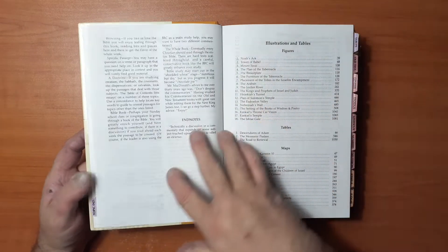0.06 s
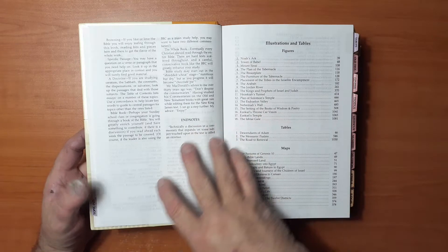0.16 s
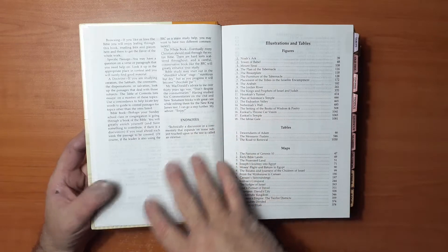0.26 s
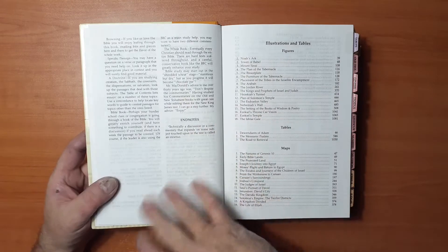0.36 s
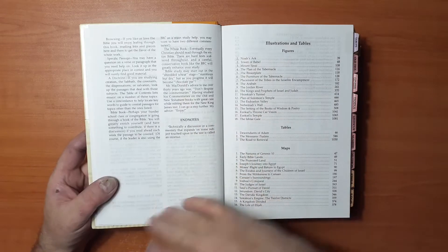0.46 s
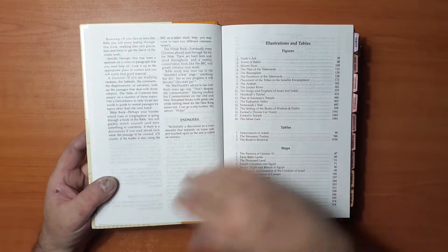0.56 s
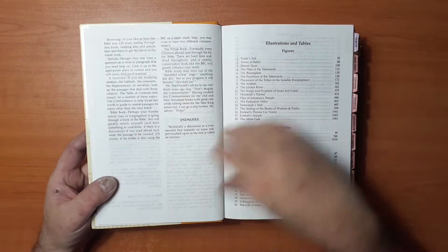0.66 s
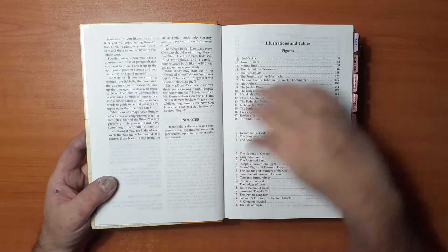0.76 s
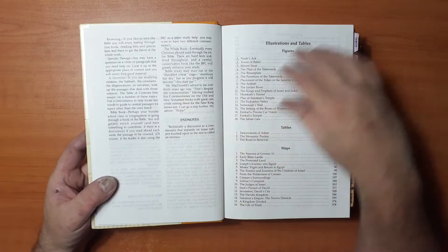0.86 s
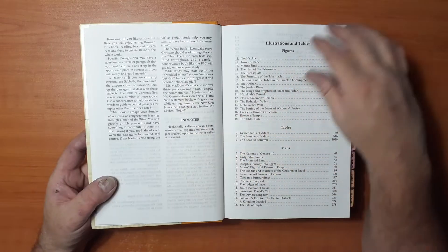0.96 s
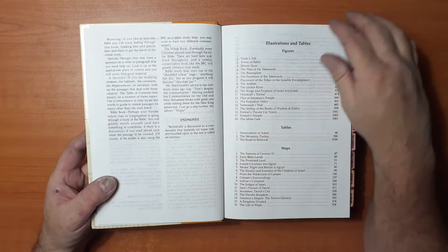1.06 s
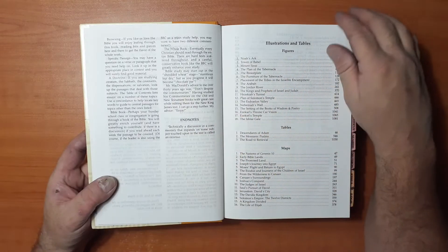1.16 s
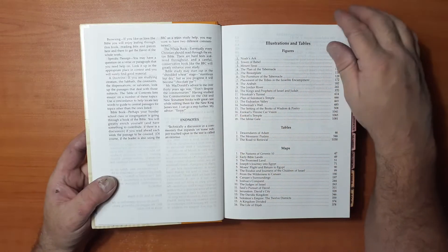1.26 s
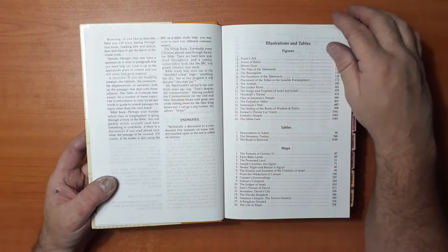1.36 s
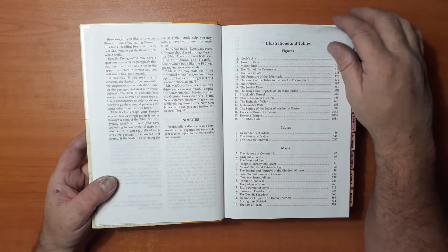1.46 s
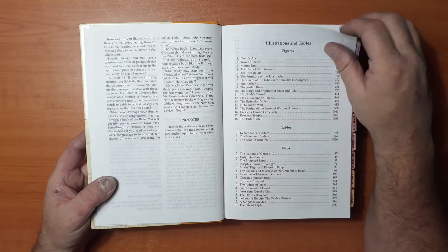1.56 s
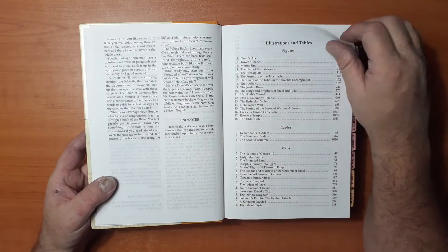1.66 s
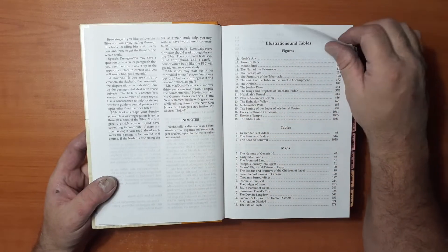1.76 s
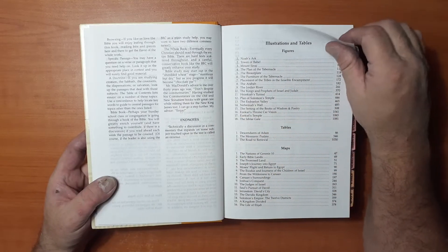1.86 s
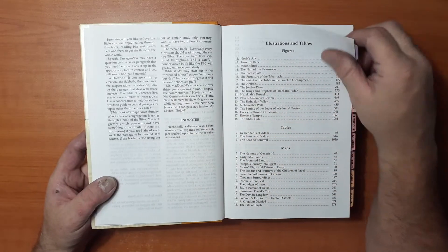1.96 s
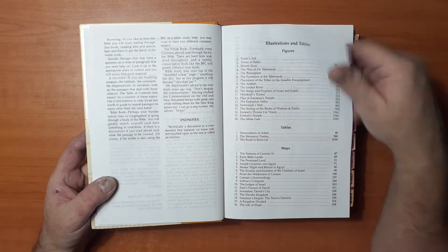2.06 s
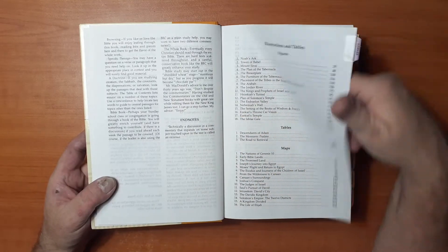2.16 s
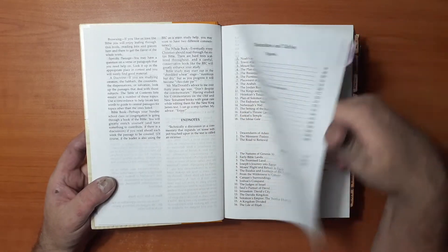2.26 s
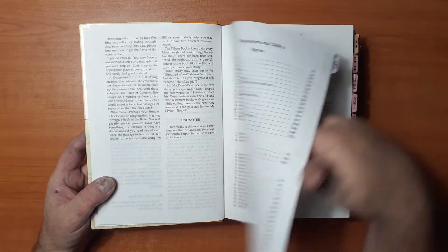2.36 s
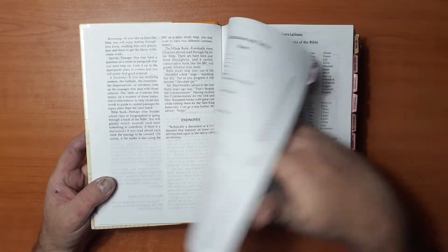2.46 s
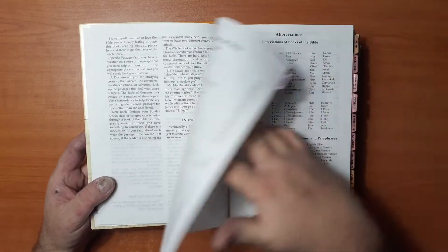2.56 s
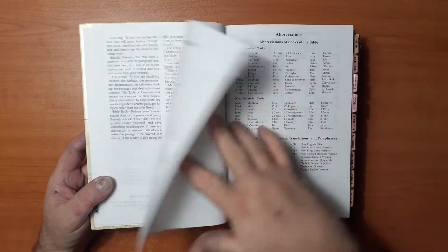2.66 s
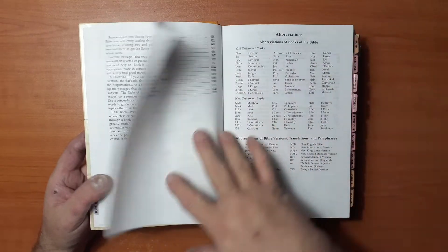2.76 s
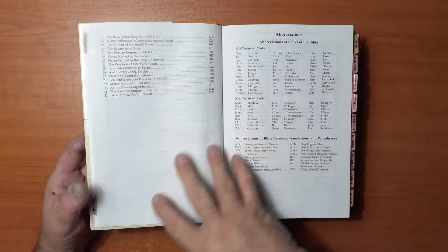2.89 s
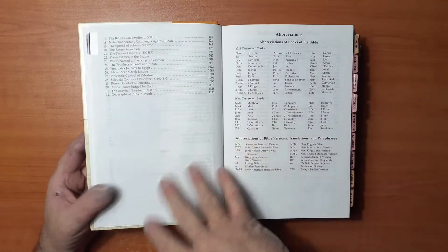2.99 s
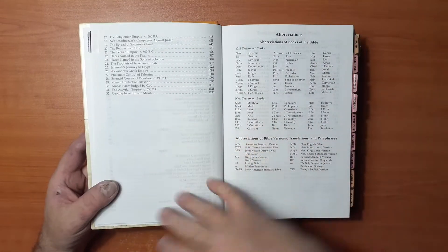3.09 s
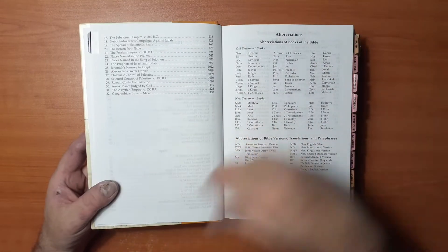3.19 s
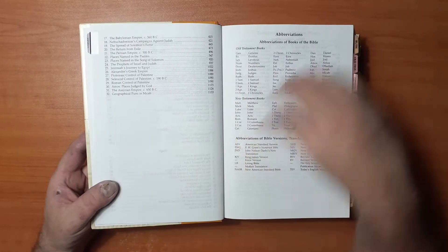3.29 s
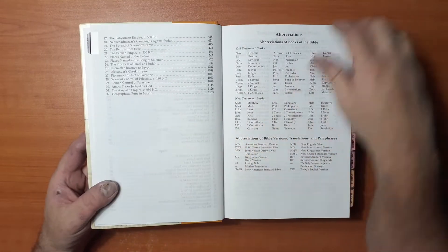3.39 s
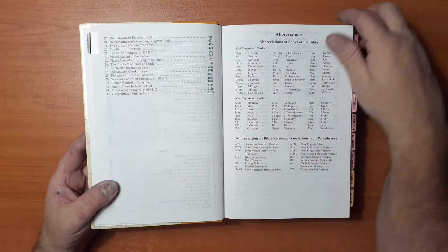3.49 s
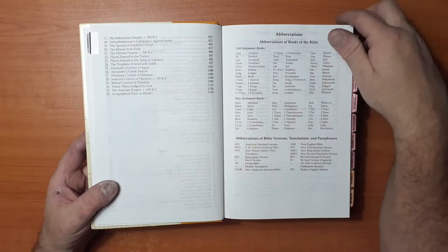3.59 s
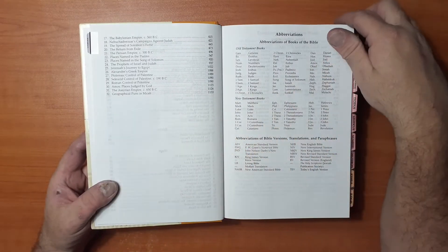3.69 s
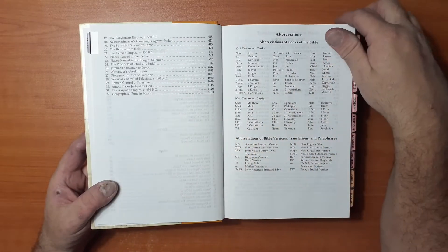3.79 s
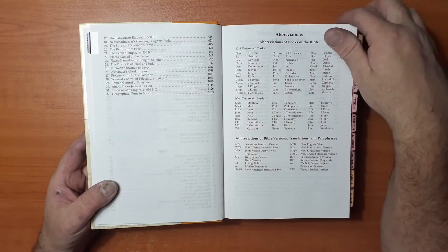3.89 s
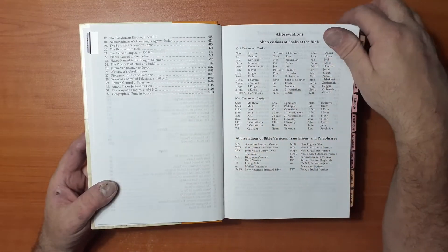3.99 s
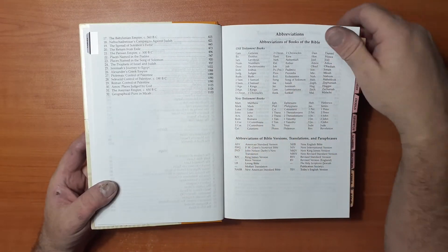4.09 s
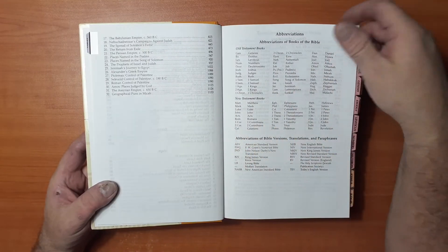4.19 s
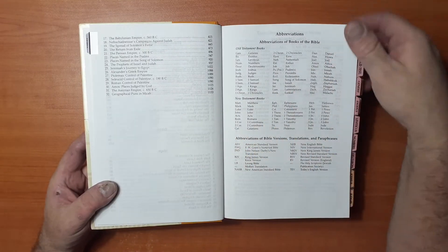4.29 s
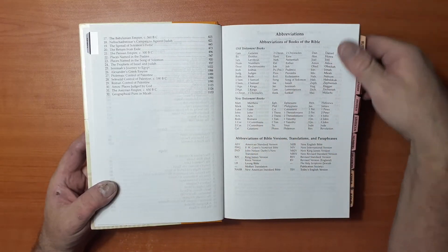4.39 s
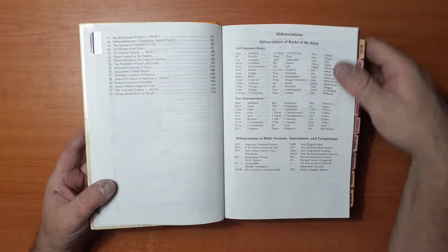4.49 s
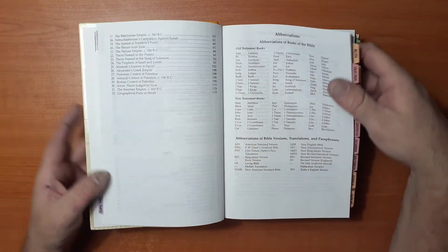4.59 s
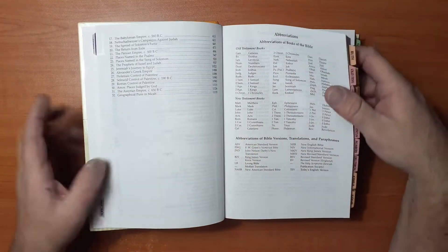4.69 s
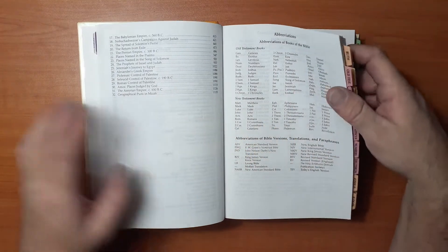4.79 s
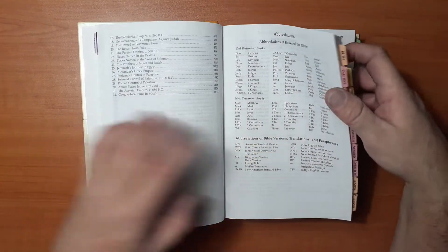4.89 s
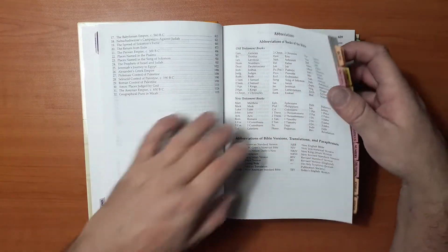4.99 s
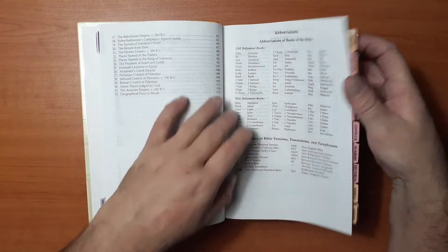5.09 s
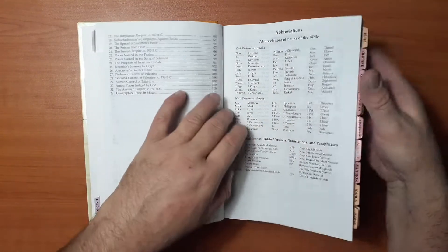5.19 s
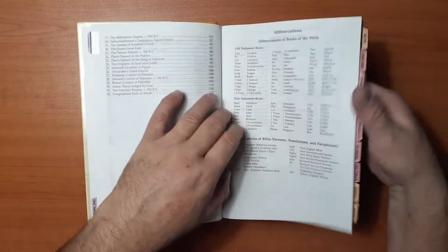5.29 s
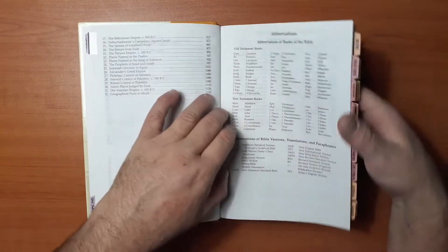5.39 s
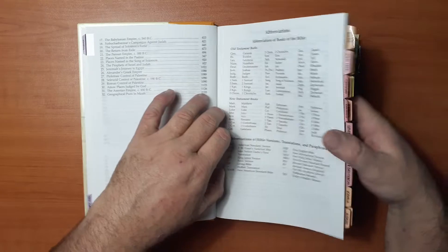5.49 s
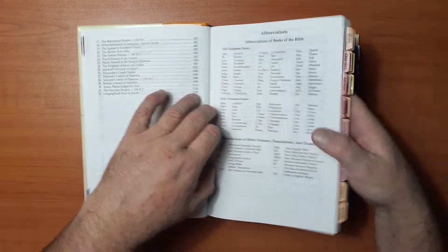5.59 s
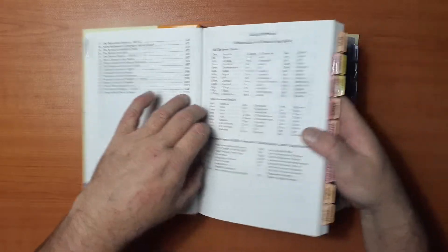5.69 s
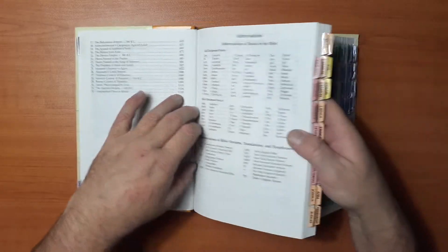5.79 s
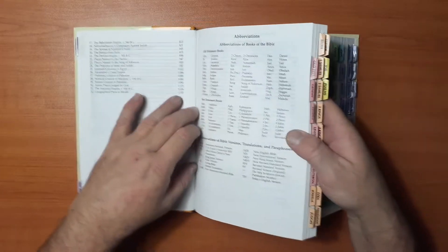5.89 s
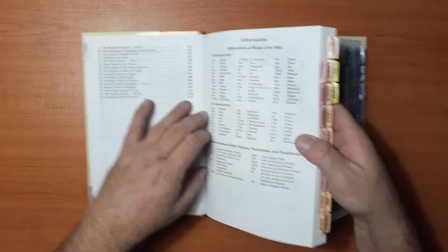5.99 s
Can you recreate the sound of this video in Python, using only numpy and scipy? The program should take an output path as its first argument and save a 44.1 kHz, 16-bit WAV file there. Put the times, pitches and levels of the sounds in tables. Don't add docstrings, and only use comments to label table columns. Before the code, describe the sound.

Soft page rubbing and crackling turns over a faint low ventilation rumble, getting busier and ending with two woody thuds, the second much louder.

```python
import sys
import numpy as np
from scipy import signal
from scipy.fft import rfft, irfft, next_fast_len
from scipy.io import wavfile
from scipy.ndimage import uniform_filter1d, map_coordinates

SR = 44100
rng = np.random.default_rng(int(sys.argv[2]) if len(sys.argv) > 2 else 0)


def attenuation_scalar(level_db):
    decades = np.asarray(level_db, float) / 20
    return 10 ** decades


def output_pcm(signal):
    pcm = np.clip(np.atleast_2d(signal).T, -1, 1) * 32767
    wavfile.write(sys.argv[1], SR, np.round(pcm).astype(np.int16))


N = 266805


def unit(x):
    return x / np.sqrt(np.mean(x ** 2) + 1e-20)


def along(points, hz):
    f, v = np.transpose(points)
    return np.interp(np.log(hz + 1), np.log(f + 1), v)


def curves(rows):
    s, *cols = np.transpose(rows)
    return [np.interp(np.arange(N) / SR, s, c) for c in cols]


def wobble(rate_hz):
    knots = rng.standard_normal(int(N * rate_hz / SR) + 4)
    return map_coordinates(knots, [np.arange(N) * rate_hz / SR], order=1)


def filtered(x, response):
    n = x.shape[-1]
    m = next_fast_len(n + 4096)
    return irfft(rfft(x, m) * response(np.fft.rfftfreq(m, 1 / SR)), m)[..., :n]


def resonance(f, hz, width):
    return 1j * f * width / (hz * hz - f * f + 1j * f * width + 1e-9)


def ring(t, hz, t60, rise):
    return np.sin(2 * np.pi * hz * t) * attenuation_scalar(-60 * t / t60) * (1 - np.exp(-t / rise))


def panned(x, pan_db):
    return x * attenuation_scalar(np.array([pan_db / 2, -pan_db / 2]))


def add_at(out, start_s, sound):
    out[..., round(start_s * SR):][..., :sound.shape[-1]] += sound


def patchy(patchy_db, channels):
    z = signal.stft(rng.standard_normal((channels, N)), nperseg=512)[2]
    field = rng.standard_normal(z.shape[1:])
    field = uniform_filter1d(uniform_filter1d(field, 8, 0), 8, 1)
    return signal.istft(z * attenuation_scalar(patchy_db * unit(field)), nperseg=512)[1][:, :N]


def friction(colour, grit_db, patchy_db, alike, crackle=0):
    grit = attenuation_scalar(grit_db * wobble(600) + grit_db / 2 * wobble(45))
    happens = rng.random(N) < 90 / SR
    creases = happens * rng.exponential(size=N) * np.sign(rng.standard_normal(N))
    source = patchy(patchy_db, channels=3) * grit + crackle * creases * [[1], [0], [0]]
    shared, left, right = filtered(source, colour)
    share = np.clip(alike, 0, 1)
    return unit(np.sqrt(share) * shared + np.sqrt(1 - share) * np.array([left, right]))


RISE_DB_PER_S, FALL_DB_PER_S = 480, 383


def movement(rows, lift_db=0):
    start, length, db, change_db = np.transpose(rows)[:4, :, None]
    t = np.arange(0, N / SR + .002, .001)
    length = np.abs(length) + .001
    before, after = np.minimum(t - start, 0), np.maximum(t - start - length, 0)
    edge_db = RISE_DB_PER_S * before - FALL_DB_PER_S * after
    stroke_db = db + lift_db + change_db * np.clip((t - start) / length, 0, 1)
    gain = np.linalg.norm(attenuation_scalar(stroke_db + edge_db), axis=0)
    return np.interp(np.arange(N) / SR, t, gain)


# start_s, length_s,
# rub_db, change_db, hiss_over_rub_db
PALM = [(0, 0.004, -51.5, -2, 0), (0.059, 0.01, -52.5, 3, -2), (0.142, .12, -59, -0.5, 9.5),
        (0.265, 0.1, -62.5, 5, 10.5), (0.402, 0.11, -63, -4, 1.5), (0.534, 0.43, -61, 5, 0.5),
        (0.956, 0.17, -61, -6.5, 1), (1.125, 0.098, -72, -4.5, -4), (2.123, 0.1, -55.5, -3, -1),
        (2.752, 0.11, -51.5, 3, -2.5), (2.887, 0.15, -58, 1, 5), (3.062, 0.054, -61, -8.5, 3),
        (3.457, 0.02, -74.5, 0.5, 2), (5.402, 0.056, -57.5, -3, -3.5), (5.923, 0.14, -72, 15, -1.5)]
# start_s, length_s, rub_db, change_db, hiss_over_rub_db
THUMB = [(1.533, 0.048, -60, -3, -1.5), (1.587, 0.15, -70.5, 0.5, -13), (1.8, 0.06, -75, -1, 0),
         (1.898, 0.017, -60, 1.5, -7), (2.04, 0.094, -68.5, 15.5, -9), (2.265, 0.21, -57, -2, -8),
         (2.57, 0.13, -63.5, -3, -7.5), (4.008, 0.053, -74, -2.5, 2.5), (4.142, 0.071, -61, -13, -17),
         (4.248, 0.14, -68, 6.5, -7), (4.476, 0.09, -70.5, 3.5, -4), (4.575, 0.062, -60, 2.5, -1.5),
         (4.691, 0.064, -67.5, 9.5, -7), (4.818, 0.22, -64, -1.5, -30), (5.085, 0.032, -59.5, 0.5, -24),
         (5.139, 0.02, -60.5, 3, -10), (5.251, .015, -51.5, -3, -4), (5.32, 0.073, -64, 0, -13),
         (5.518, .06, -74.5, -5, 2)]
# start_s, length_s, rasp_db, change_db, resonance_hz
BEND = [(0, 0.042, -54, -3, 1580), (0.08, 0.055, -59, -1, 1810), (0.152, 0.086, -58, -7.5, 1780),
        (0.262, 0.13, -64, 7, 2080), (0.555, 0.059, -67.5, 7, 2260), (0.643, 0.022, -54, -1.5, 1750),
        (1.54, .02, -70.5, 1, 1440), (1.893, .03, -76, 0, 1560), (2.132, 0.1, -53, -0.5, 2110),
        (2.28, 0.18, -65, 8, 2100), (2.577, 0.17, -60.5, -9, 2160), (2.719, 0.2, -55.5, -0.5, 1570),
        (2.955, .14, -58.5, -1, 2020), (4.152, .06, -62.5, -13, 2180), (4.24, 0.05, -66.5, -3, 1910),
        (4.318, 0.1, -62, -9, 2030), (4.462, .05, -73, -2, 1440), (4.529, .1, -65.5, 14.5, 2050),
        (4.665, 0.11, -61, 5, 2000), (4.805, 0.035, -57.5, 0.5, 2130), (4.858, 0.092, -53, -1, 2300),
        (4.985, .03, -56, -3, 2220), (5.038, 0.071, -55, -3.5, 2420), (5.132, 0.024, -54.5, 3, 1550),
        (5.208, 0.084, -66, 16, 1950), (5.31, .06, -58, -15, 1960), (5.395, 0.034, -51.5, -12, 2360),
        (5.44, 0.055, -67.5, 4, 1840), (5.51, 0.08, -73, -9, 1600), (5.88, 0.16, -64.5, 9, 1440)]
# frequency_hz, density_db (per Hz)
HISS = [(5000, -56), (7500, -38), (8600, -11.5), (10300, -7), (11800, -0.5), (13500, -2.5), (15800, -3.5)]
# frequency_hz, density_db (per Hz)
RUB = [(1650, -18.5), (2800, -9.5), (3440, -8), (3770, -9), (4820, -5.5), (6460, -3), (7770, -12),
       (9000, -21.5), (11700, -22), (19800, -120)]
# frequency_hz, density_db (per Hz)
RASP = [(500, -45), (900, -3.5), (1500, -5), (2500, -7), (4000, -2.5), (6000, -26.5)]
SHEET_HZ = np.array([1400, 1800, 2300, 2900])
REST_RUB_DB, REST_RASP_DB = -95.5, -87
THUMB_TOP_HZ = 13100
GLIDE_HZ, GLIDE_WIDTH_HZ, GLIDE_LOSS = 3000, 3500, 0.67


def strokes():
    fibres = friction(lambda f: attenuation_scalar(along(HISS, f)), grit_db=1.5, patchy_db=1.3, alike=.25)
    palm, thumb = (movement(rows, lift_db=np.array(rows)[:, -1:]) for rows in (PALM, THUMB))
    dull = filtered(fibres, lambda f: 1.45 / (1 + (f / THUMB_TOP_HZ) ** 8))
    hiss = palm * fibres + thumb * dull

    paper = friction(lambda f: attenuation_scalar(along(RUB, f)), grit_db=2.2, patchy_db=2.2, alike=.3, crackle=6)
    glide = movement(PALM[5:8]) * filtered(paper, lambda f: resonance(f, GLIDE_HZ, GLIDE_WIDTH_HZ))
    rub = (movement(np.array(PALM + THUMB)) + attenuation_scalar(REST_RUB_DB)) * paper - GLIDE_LOSS * glide

    rasp = friction(lambda f: attenuation_scalar(along(RASP, f)), grit_db=3, patchy_db=2.5, alike=.4, crackle=8)
    bend_hz, = curves([(s + length / 2, hz) for s, length, _, _, hz in BEND])
    steps_hz = np.array(SHEET_HZ)[:, None]
    near = np.clip(1 - np.abs(np.log(bend_hz / steps_hz)) / np.log(1.27), 0, 1)
    resonant = filtered(rasp, lambda f: resonance(f, steps_hz[:, None], 400))
    sheet = np.sum(near[:, None] * resonant, axis=0)
    rasp = (movement(BEND) + attenuation_scalar(REST_RASP_DB)) * (.55 * rasp + 2 * sheet)
    return panned(hiss, np.array([4.2])) + panned(rub, np.array([2.2])) + panned(rasp, np.array([3.2]))


# frequency_hz, density_db (per Hz)
AIR = [(25, -40), (43, -10.5), (71, -4), (110, -6), (161, -2.5), (250, -4.5), (390, -8), (640, -8),
       (870, -7), (1100, -11), (1500, -15), (1900, -31), (2600, -36), (4000, -62)]
# frequency_hz, width_hz, level_db
DUCT = [(162.2, 27, 5), (238, 27, 0.5), (482.5, 10.4, 9.5), (681, 95, 6)]
# frequency_hz, coherence (0 to 1)
AIR_ALIKE = [(60, 0.83), (300, 1), (700, 0.56), (1500, 0.82), (5000, 0)]
AIR_DB = -56.5


def room_tone():
    def gain(f):
        ducts = sum((attenuation_scalar(db) - 1) * resonance(f, hz, width) for hz, width, db in DUCT)
        return attenuation_scalar(along(AIR, f)) * np.abs(1 + ducts)

    def turn(f):
        return np.arccos(np.clip(along(AIR_ALIKE, f), -1, 1)) / 2

    air = patchy(0.49, channels=2)
    mid, side = filtered(air, lambda f: gain(f) * [np.cos(turn(f)), np.sin(turn(f))])
    pair = unit(np.array([np.roll(mid + side, 21), mid - side]))
    return pair * attenuation_scalar(AIR_DB + 0.58 * wobble(1.92) + np.array([[1.1], [-1.1]]))


# start_s, length_s, level_db, change_db
SHIFT = [(.06, 0.035, -52.5, -6.5), (.15, 0.4, -58, -0.5), (.52, 0.11, -67, -10), (.65, 0.045, -59, 3),
         (.87, 0.18, -65, 9.5), (4.38, 0.063, -57, -7), (4.55, 0.46, -70.5, 12), (5.135, 0.038, -50.5, 0.5),
         (5.25, 0.034, -48, -6), (5.33, 0.044, -62, 11), (5.39, 0.16, -51.5, -16), (5.55, 0.05, -51, -4),
         (5.63, 0.046, -60, 4), (5.93, 0.092, -53, 5)]


def shifting():
    table = friction(lambda f: resonance(f, 482, 58) + 0.21 * resonance(f, 700, 160),
                     grit_db=1.0, patchy_db=4.0, alike=0.95)
    return panned(table * movement(SHIFT, lift_db=-3.5), np.array([3.5]))


# start_s, level_db, length_s, low_body_db, top_hiss_db
SCUFF = [(1.489, -53.5, 0.039, -7, -23), (1.549, -43.5, 0.011, -10, -25), (1.733, -46, 0.0088, -15, -24),
         (1.7945, -45, 0.01, -15, -13), (1.851, -43.5, 0.0095, -16, -31), (1.884, -47.5, 0.012, -16, -26),
         (2.56, -51.5, 0.012, -2, -2), (3.998, -54, 0.029, -20, -21), (4.118, -55, 0.037, -15, -16),
         (4.463, -56.5, 0.03, -20, -6), (5.2225, -38.5, 0.022, 7, -2.5)]
# start_s, level_db, centre_hz, length_s, low_body_db
FOLD = [
    (0.108, -46, 1870, 0.045, -22),
    (0.147, -47, 1840, 0.044, -25),
    (2.258, -48, 1720, 0.033, -18),
    (2.472, -46, 3150, 0.01, 7),
    (4.853, -39, 2170, 0.029, -8),
    (4.985, -42.5, 2400, 0.02, -12),
    (5.2226, -36, 3900, 0.034, 1),
    (5.388, -43, 2560, 0.025, 4),
]
CORNER_HZ, FOLD_TOP_DB = 6560, -28


def scuffs():
    out, t = np.zeros((2, N + SR)), np.arange(SR // 8) / SR
    slips = [(s, db, CORNER_HZ, *rest) for s, db, *rest in SCUFF]
    slips += [(*row, FOLD_TOP_DB) for row in FOLD]
    for s, db, hz, length, low_db, top_db in slips:
        u = t / np.clip(length, .001, .04)
        shape = (1 - np.exp(-u / 0.15)) * np.exp(-u * u)
        noise = rng.standard_normal((3, len(t)))
        grit_db = 0.97 * rng.standard_normal(len(t) // 16 + 1).repeat(16)[:len(t)]
        grains = noise * attenuation_scalar(grit_db)
        grains = 0.25 * grains[0] + 2.0 * grains[1:]
        bright = unit(filtered(grains, lambda f: resonance(f, hz, 0.34 * hz) ** 2))
        body = unit(filtered(grains, lambda f: resonance(f, 1470, 1660) ** 2))
        top = unit(filtered(grains, lambda f: attenuation_scalar(along(HISS, f))))
        slip = (bright + attenuation_scalar(low_db) * body + attenuation_scalar(top_db) * top) * shape
        add_at(out, s, panned(slip, np.array([4.5])) * attenuation_scalar(db - 7.5))
    return out[:, :N]


# start_s, level_db, pitch_hz, t60_s
TICK = [(.114, -47, 1810, .02), (.129, -45, 1980, 0.022), (.145, -40, 1870, 0.025), (.152, -48, 1850, .025),
        (.171, -49, 1900, .02), (.63895, -39, 1810, 0.011), (.6395, -28.5, 1760, 0.012),
        (0.6402, -43.5, 577, 0.061), (.6395, -40, 2830, .006), (1.7345, -57, 3380, .02),
        (1.735, -60, 5170, .015), (1.7985, -52, 3500, .02), (1.799, -60, 5300, .012),
        (1.8535, -61, 3500, .015), (1.8865, -60, 3600, .015), (2.267, -46, 1694, .025),
        (2.391, -49, 2140, 0.022), (2.431, -46, 450, 0.024), (2.473, -43, 1090, .015),
        (2.7088, -35, 1600, .013), (2.7143, -38, 1590, .01), (2.7088, -34, 3800, .005),
        (2.712, -47, 2970, .02), (2.9448, -13.5, 4900, 0.0021), (2.945, -27, 3400, .005),
        (2.9445, -27, 2300, 0.0053), (2.9482, -32, 2800, .016), (2.9495, -40, 4700, .008),
        (4.6235, -40, 1950, .01), (4.694, -46, 1050, 0.016), (4.855, -48, 2190, .012),
        (4.905, -39, 2200, .012), (4.945, -50, 2400, .012), (5.087, -39, 2080, .012),
        (5.2028, -46, 1500, 0.0093), (5.223, -38, 1290, .012), (5.226, -35, 1420, .016),
        (5.226, -38, 2450, 0.011), (5.2319, -36.5, 855, .035), (5.2395, -41, 437, 0.056),
        (5.2362, -35, 813, 0.043), (5.234, -40, 6700, .01), (5.237, -40, 7100, 0.013),
        (5.2383, -36, 1680, 0.013), (5.2615, -44, 1800, .012), (5.386, -45, 487, 0.043),
        (5.398, -37, 2750, 0.022), (5.6936, -29, 2503, 0.036), (5.776, -7, 1650, 0.003),
        (5.8135, -21.5, 2020, .008),
        (2.1043, -48, 2420, .008), (2.114, -41, 3070, 0.0087), (2.133, -38, 3290, .008),
          (2.2156, -41, 3000, .012), (2.5723, -53, 2220, .01), (2.726, -44, 1800, .012),
          (2.8641, -40, 6360, .005), (4.4608, -47, 1700, .015), (4.5601, -50, 4190, .01),
          (4.8639, -44, 2160, .015), (4.6182, -43, 1740, .008), (4.72, -50, 3300, .015),
          (4.772, -49, 3600, .008), (4.82, -49, 3300, .012), (4.877, -45, 3500, .01),
          (4.925, -48, 3400, .012), (4.961, -47, 3300, .008), (5.05, -50, 3600, .012),
          (5.125, -49, 3300, .012), (5.15, -49, 2400, .012), (1.7978, -50, 6660, .012),
          (1.82, -62, 5000, .008), (1.91, -57, 4500, .008), (5.0, -46, 2800, .012),
          (5.0245, -49, 2190, .015), (5.042, -46, 2400, .02), (5.0599, -44, 2700, .02),
          (5.073, -45, 2250, .02), (5.1, -45, 2650, .02)]


def ticks():
    out, t = np.zeros((2, N + SR)), np.arange(SR // 20) / SR
    for s, db, hz, t60 in TICK:
        add_at(out, s, panned(attenuation_scalar(db) * ring(t, hz, t60, 0.00031), np.array([3])))
    return out[:, :N]


# start_s, level_db, centre_hz, width_hz, t60_s
SNAP = [(0.477, -39, 350, 500, 0.052), (0.6397, -52, 2050, 1000, 0.012), (2.4317, -43, 1500, 2500, .006),
        (2.7097, -38, 2300, 2000, 0.077), (2.9456, -29, 3970, 4500, 0.044), (2.977, -39, 2800, 3000, .012),
        (4.6187, -34.5, 1600, 1500, 0.021), (4.7685, -37, 1400, 2000, 0.013), (4.96, -37, 2000, 2000, .008),
        (5.231, -33.5, 860, 400, 0.053), (5.235, -43, 1110, 900, .04)]


def snaps():
    def sheet(f, hz, width):
        lowpass = 1 + 1j * f / 7000 / 0.7 - (f / 7000) ** 2
        return resonance(f, hz, width) ** 2 / lowpass ** 2

    out, t = np.zeros((2, N + SR)), np.arange(SR // 10) / SR
    for s, db, hz, width, t60 in SNAP:
        rattle = rng.standard_normal((2, len(t))) * attenuation_scalar(-60 * t / t60)
        rattle[:, 0] += 9
        click = filtered(rattle, lambda f: sheet(f, hz, width))
        add_at(out, s, panned(attenuation_scalar(db) * click / np.abs(click).max(), np.array([3.2])))
    return out[:, :N]


def thump(t):
    low = ring(t, 103.7, 0.23, 0.039) + 0.07 * ring(t, 76, 0.28, .012)
    return low + 1.54 * ring(t, 163, 0.049, 0.0028) + 0.54 * ring(t, 255.0, 0.13, 0.0017)


# start_s, level_db, cover_hz, cover_db, thump_db
TAP = [
    (0.6396, -30, 1740, -20, -31),
    (2.711, -65, 1590, 5, -11),
    (4.616, -60, 1740, 13, -5),
    (5.14, -36.5, 1310, 4, -16),
    (5.244, -25.5, 1030, 3.5, -13),
    (5.362, -36, 1080, -1, 0.5),
    (5.402, -51, 1050, -13, 7),
]
# start_s, level_db, cover_hz, cover_db, thump_db
RIM_TAP = [
    (0.479, -36, 1300, -15, 3),
    (4.77, -47.5, 1670, 9, 8),
    (5.6103, -35, 1297, 2.5, -3.5),
]
TABLE_HZ, RIM_HZ = 484, 604


def taps():
    out, t = np.zeros((2, N + SR)), np.arange(SR // 3) / SR
    rows = [(TABLE_HZ, *row) for row in TAP] + [(RIM_HZ, *row) for row in RIM_TAP]
    for table_hz, s, db, cover_hz, cover_db, thump_db in rows:
        table = ring(t, table_hz, 0.088, 0.00015) + 0.26 * ring(t, table_hz, 0.021, 0.00077)
        cover = ring(t, cover_hz, 0.014, 0.00087)
        cover += 0.28 * ring(t, 1.2 * cover_hz, 0.072, .001)
        cover += 0.27 * ring(t, 1.3 * cover_hz, .008, 0.00034)
        blow = attenuation_scalar(db - 10.0) * (table + attenuation_scalar(cover_db) * cover + attenuation_scalar(thump_db) * thump(t))
        add_at(out, s - .0007, panned(blow, np.array([3.5])))
    return out[:, :N]


# start_s, level_db, left_over_right_db, thump_db, slap_db
KNOCK = [
    (5.6927, -13, 2, -21.5, -18.5),
    (5.7757, -2, 3, -35.5, -18),
]
# pitch_hz, level_db, t60_s
BOARDS = [
    [(489, -2.5, 0.11), (615, -5.5, 0.09), (658, -8.5, 0.21), (556, -12, 0.036), (963, -14, 0.031),
     (1120, -31, 0.033), (1600, -24, 0.02)],
    [(475, -19.5, 0.23), (620, -18.5, 0.23), (655, -19.5, 0.26), (679, -14, 0.19), (686, -5, 0.038),
     (786, -20.5, 0.061), (1180, -21, 0.02), (1340, -26, 0.046), (740, -27, 0.13), (830, -29, .1)],
]
# delay_s, level_db, brightness_db (per octave)
BOUNCES = [
    [(-.001, -21, 17.5), (0, -4.5, 6), (.012, -13.5, 0), (.024, -16.5, 11)],
    [(-.0015, -8.5, 7), (0, -6, 2.5), (.026, -15, 4.5), (.0375, -17, 9.5), (.062, -23.5, 2)],
]
# pitch_hz, level_db, t60_s
ROCK = [
    [(660, -24, .3), (613, -27, .15), (1200, -32, .06)],
    [(692, -21, 0.35), (644, -25, .25), (710, -25, .2), (1290, -33, .1), (1340, -32, .1)],
]
# delay_s, over_s, level_db
SETTLE = [
    (.033, .006, -14),
    (.045, 0.0089, -4),
]
# frequency_hz, density_db (per Hz)
CRACK = [(300, -40), (800, 3.5), (1300, 4.5), (1900, -0.5), (2500, -2), (3500, -11.5), (6500, -18),
         (8500, -35.5), (12000, -27.5), (15800, -42)]


def knocks():
    out, t = np.zeros((2, 2, N + SR)), np.arange(SR // 3) / SR
    for knock, modes, contacts, settle, rocking in zip(KNOCK, BOARDS, BOUNCES, SETTLE, ROCK):
        s, db, pan_db, thump_db, slap_db = knock
        rest, over, mute_db = settle
        rock = sum(attenuation_scalar(level) * ring(t, hz, t60, .002) for hz, level, t60 in rocking)
        add_at(out[0], s, attenuation_scalar(db + thump_db) * thump(t) + attenuation_scalar(db) * rock * [[1], [-1]])
        for delay, contact_db, tilt_db in contacts:
            boards = sum(attenuation_scalar(level + tilt_db * np.log2(hz / 650)) * ring(t, hz, t60, .0006)
                         for hz, level, t60 in modes)
            slap = unit(filtered(rng.standard_normal((2, len(t))), lambda f: attenuation_scalar(along(CRACK, f))))
            slap = slap * attenuation_scalar(tilt_db + slap_db - 60 * t / 0.047)
            blow = boards * attenuation_scalar(-60 * t / .02)
            muted = boards * attenuation_scalar(mute_db * np.clip((t + delay - rest) / over, 0, 1))
            both = [panned(muted + slap, np.array([pan_db])), 0.7 * blow + slap]
            add_at(out, s + delay, attenuation_scalar(db + contact_db) * np.array(both))
    return filtered(out[..., :N], lambda f: (1j * f / (1j * f + 35)) ** 2)


# frequency_hz, t60_s
WALLS = [(200, 0.32), (700, 0.37), (2000, 0.28), (6000, 0.28), (14000, 0.3)]
# frequency_hz, coherence (0 to 1)
WALLS_ALIKE = [(150, 0.66), (400, 0.66), (800, 0.18), (1500, 0.12)]


def walls(x):
    hz, t, z = signal.stft(rng.standard_normal((2, SR // 2)), SR, nperseg=256)
    alike = np.clip(along(WALLS_ALIKE, hz), 0, 1)[:, None]
    z = np.array([z[0], alike * z[0] + np.sqrt(1 - alike ** 2) * z[1]])
    tail = signal.istft(z * attenuation_scalar(-60 * t / along(WALLS, hz)[:, None]), SR, nperseg=256)[1]
    late = np.pad(x, ((0, 0), (250, 0)))
    return signal.fftconvolve(late, tail / np.linalg.norm(tail[0]), axes=1)[:, :N]


# time_s, left_lag_samples, left_over_right_db
LAG = [(0, -6, 0), (.64, -4, 1.5), (.9, -4, 0), (1.2, 20, 0), (1.9, 19, 0), (2.3, 3, 0), (2.6, -4, 0),
       (2.75, -3, 1), (2.9, -8, -1), (3.2, -6, 0), (3.5, 21, 0), (4.3, 21, -1), (4.6, 6, -3), (5.4, 4, -3),
       (5.66, -4, 0), (6.05, -5, .5)]


def placed(x):
    lag, pan_db = curves(LAG)
    left = map_coordinates(x[0], [np.arange(N) - lag], mode="nearest")
    return panned(np.array([left, x[1]]), pan_db)


KNOCK_ECHO_DELAY_S = .00036


def scene():
    small = scuffs() + snaps() + taps() + ticks()
    paper = strokes() + shifting()
    near, far = knocks()
    echo = walls(attenuation_scalar(-12.0) * small + attenuation_scalar(-8.0) * paper)
    knock_echo = walls(np.roll(far, round(KNOCK_ECHO_DELAY_S * SR), axis=1))
    echo = echo + panned(attenuation_scalar(-4) * knock_echo, np.array([3.5]))
    return placed(small + near + paper) + echo + room_tone()


def top_cut(x):
    return signal.sosfilt(signal.butter(12, 16340, fs=SR, output="sos"), x)


# frequency_hz, density_db (per Hz)
SELF = [(1500, -20), (3000, -4), (6000, -4), (8500, -10), (12500, -1), (15800, 0)]
TOP_HZ = 15790


def record(dry):
    hiss = attenuation_scalar(-80.5) * unit(filtered(rng.standard_normal((2, N)), lambda f: attenuation_scalar(along(SELF, f))))
    mix = filtered(dry + hiss, lambda f: (1j * f / (1j * f + 40)) ** 2 * (f < TOP_HZ))
    return top_cut(mix)


dry = scene()
out = record(dry)
output_pcm(out)
```